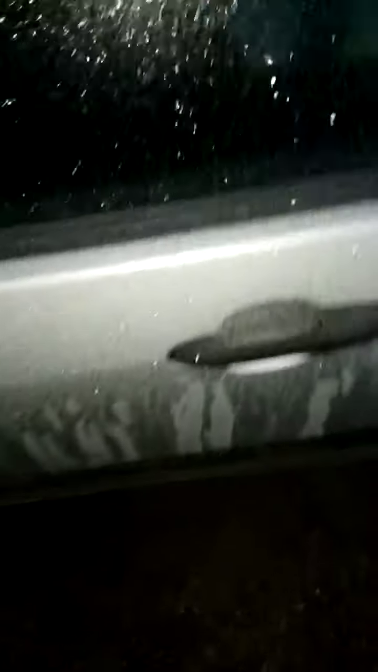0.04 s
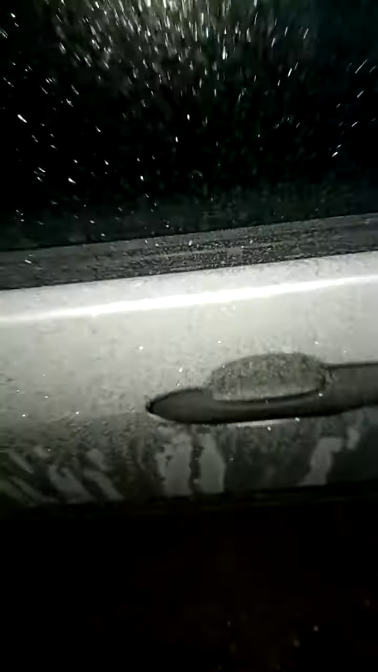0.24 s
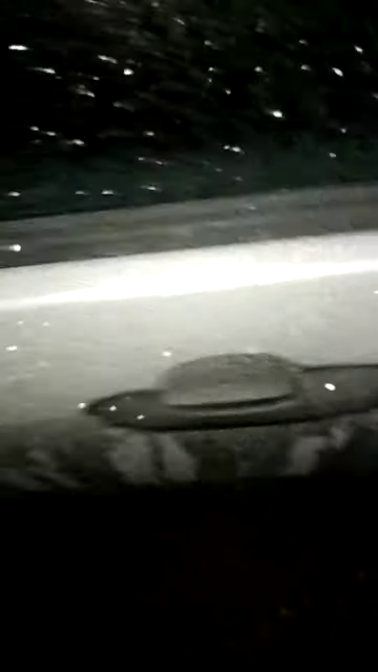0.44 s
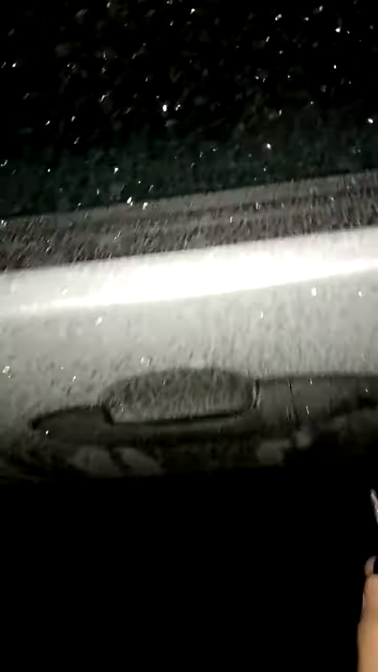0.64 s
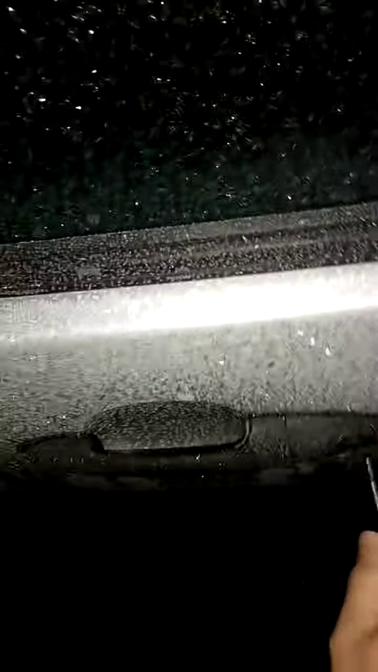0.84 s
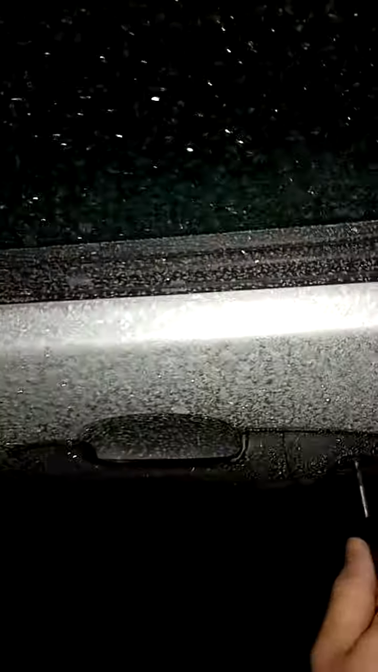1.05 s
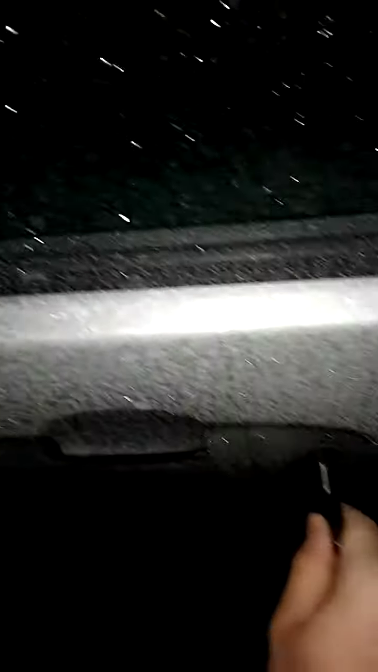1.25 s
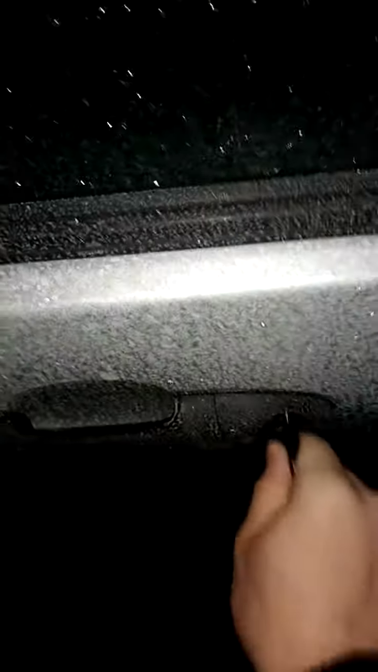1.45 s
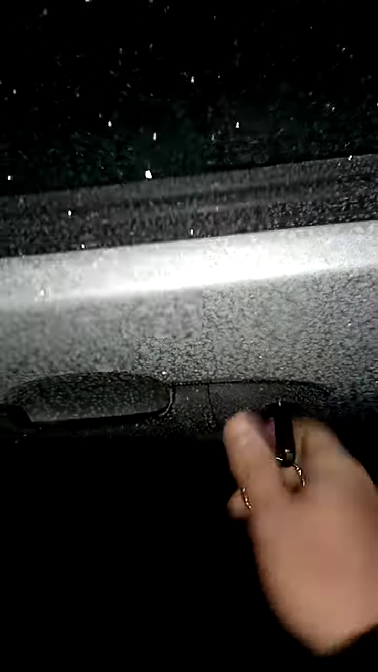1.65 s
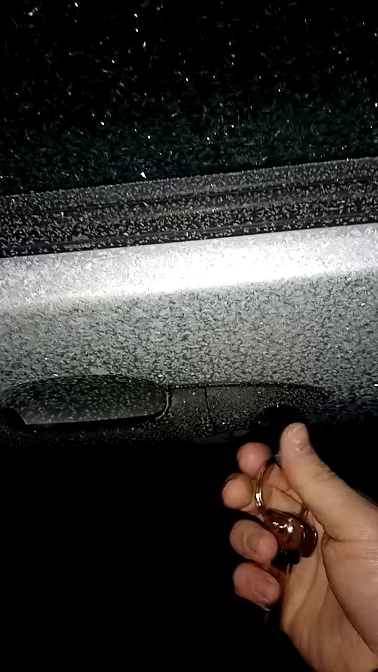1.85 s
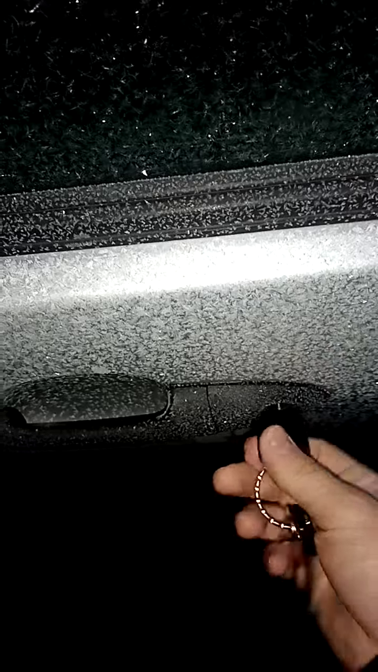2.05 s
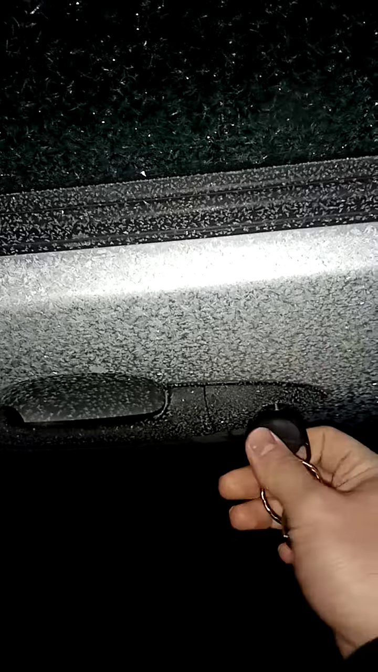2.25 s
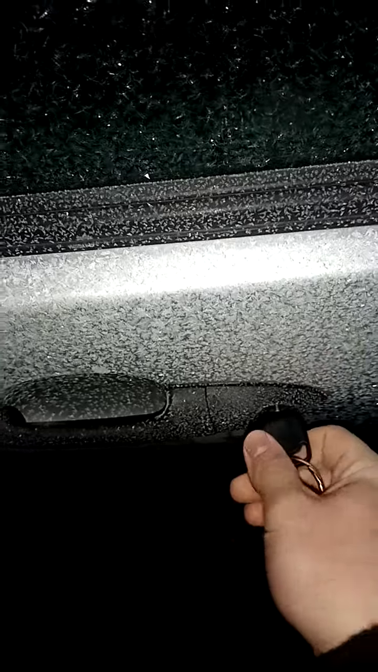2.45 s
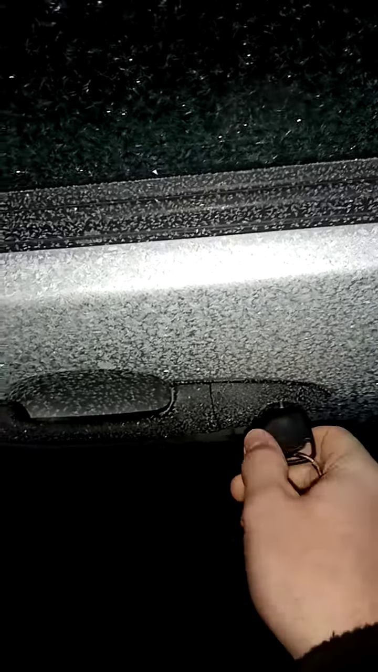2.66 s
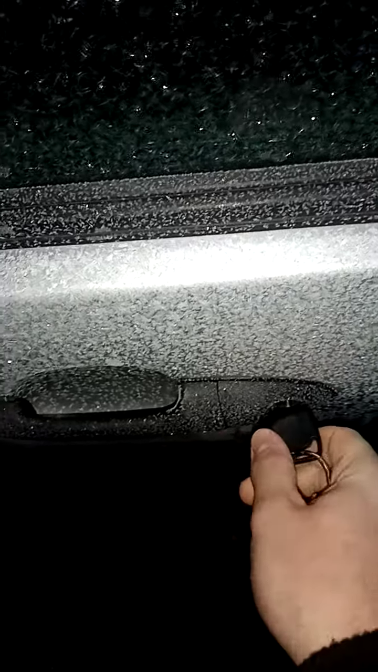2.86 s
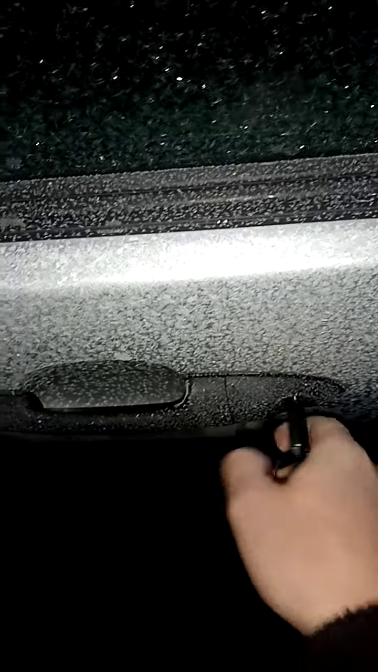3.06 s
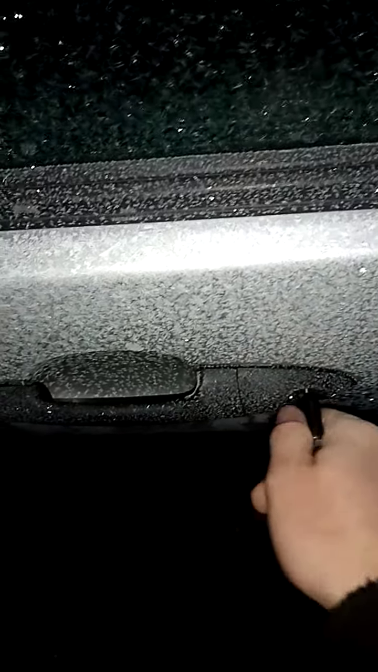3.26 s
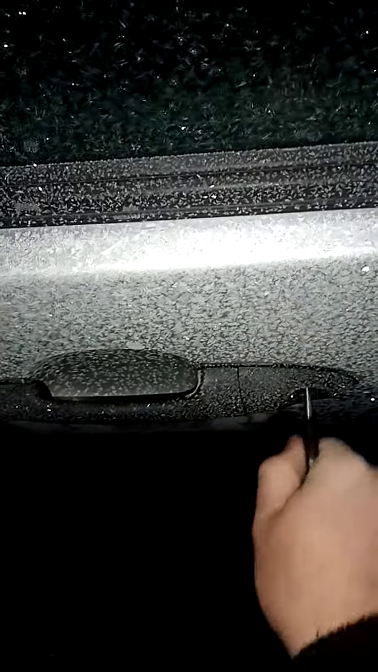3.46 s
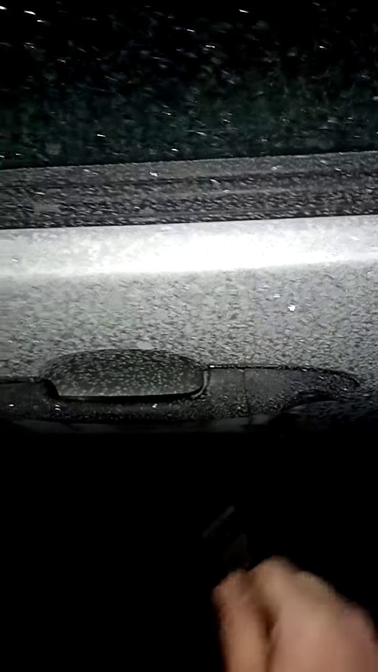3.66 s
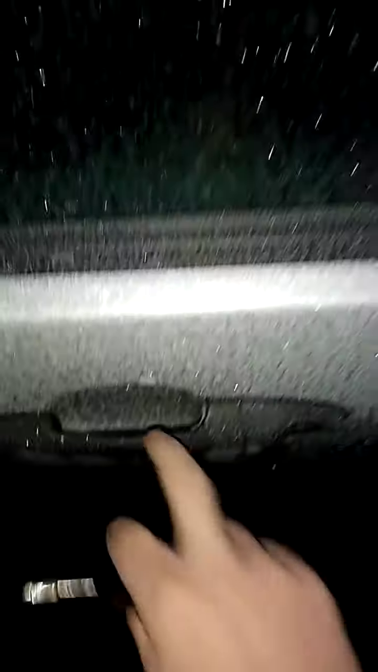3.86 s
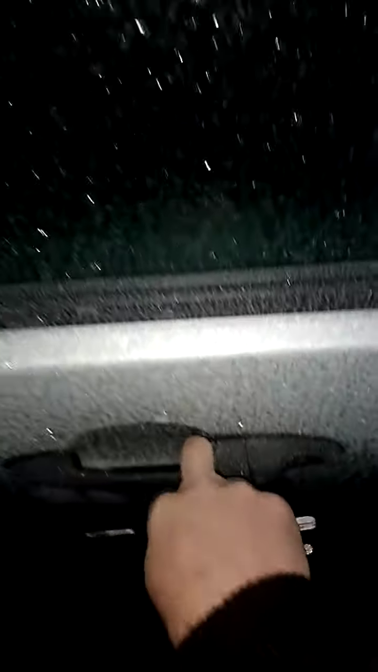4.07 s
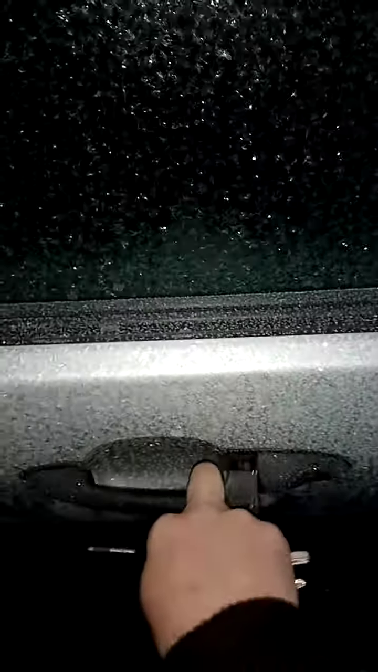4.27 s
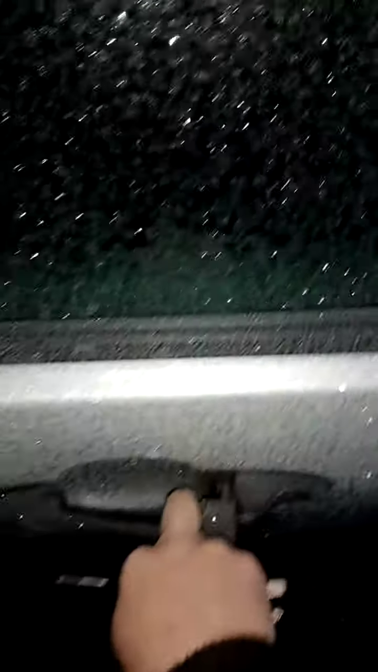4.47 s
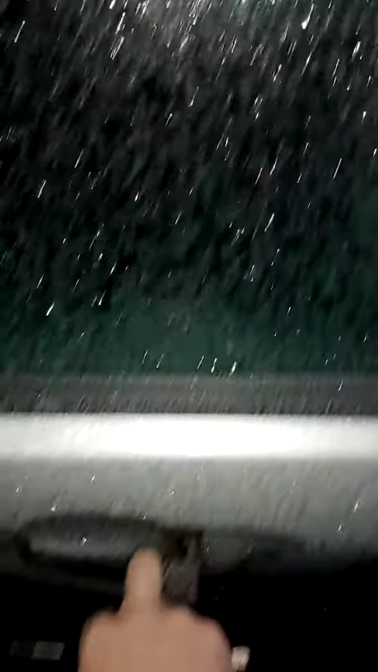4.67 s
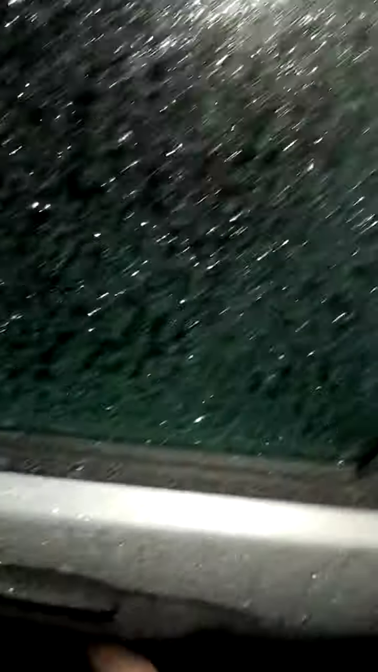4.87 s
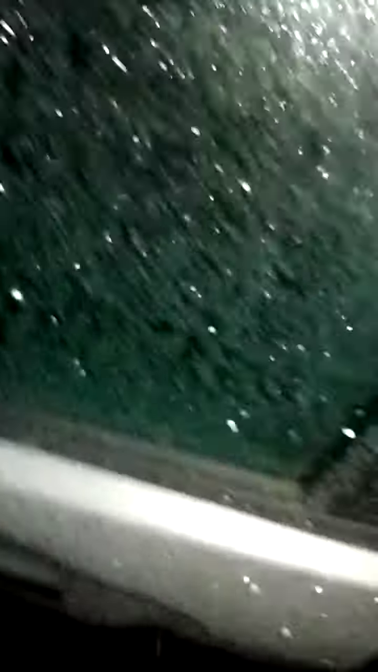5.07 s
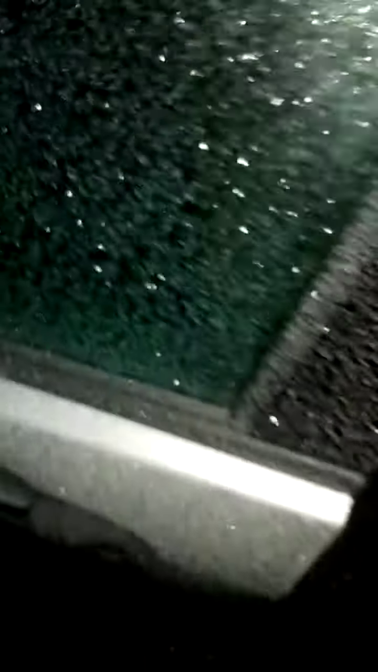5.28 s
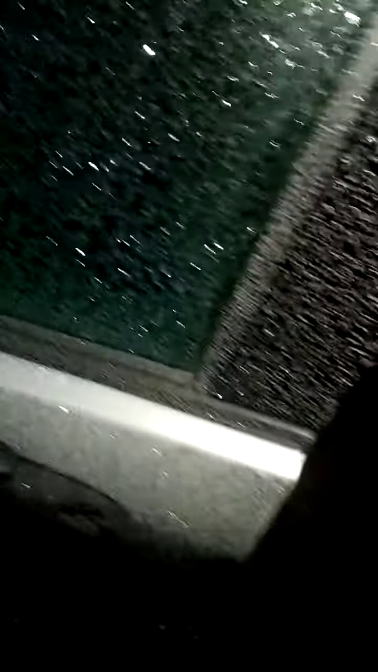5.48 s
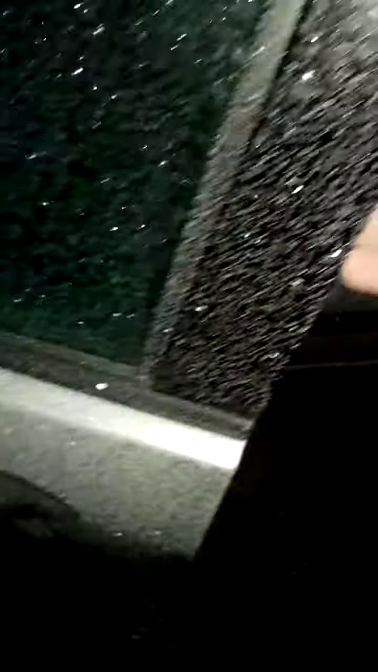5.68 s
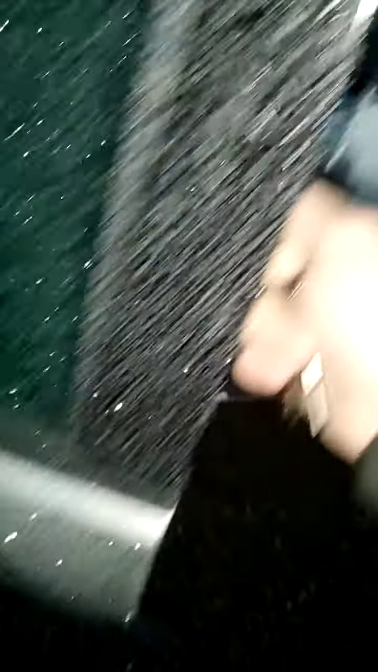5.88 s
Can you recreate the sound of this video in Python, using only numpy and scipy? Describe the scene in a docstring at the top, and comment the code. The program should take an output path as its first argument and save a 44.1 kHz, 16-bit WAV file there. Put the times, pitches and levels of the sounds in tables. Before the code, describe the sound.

A quiet night outdoors, faint low air and slight hiss, with a phone microphone very close to a car door; one side is crisp, the other muffled by the hand. In the first 0.4 s fingers scuff frost with small dull ticks and nylon rustle. Soft knocks follow at 0.6 and 0.9-1.1 s, then a hollow bump at 1.45 s as the key seats. Keys jingle in thin, quick chinks from 1.6 to 1.9 s. At 2.35-2.45 s they chink brighter, then a hard knock at 2.65 s lands as a small lock motor whirs from about 2.55 to 2.95 s, ending in more jingling to 3.05 s. A rubbing bump comes at 3.45 s with a sleeve swish and faint zip. The loudest event is a deep, boomy handle clunk at 4.26 s. At 4.8 s the latch knocks sharply under a strong nylon swish and a short rising zip; soft rustles and faint ticks trail to the end.

```python
"""Outdoors at night a hand unlocks a frosted car door, heard by a phone held close.
The key scrapes into the lock and the keys chink: noise ticks and grains set dying sine tones ringing.
The handle clunks and the latch lets go: low door tones boom under bursts of noise. The lock motor whirs
as sines that speed up, with gear noise. A nylon sleeve rustles as patchy noise and zips as gliding tones.
One port of the phone faces the door, the other is muffled by the hand."""
import sys
import numpy as np
from scipy import signal
from scipy.fft import rfft, irfft
from scipy.io import wavfile
from scipy.ndimage import uniform_filter1d

SR = 44100
rng = np.random.default_rng(int(sys.argv[2]) if len(sys.argv) > 2 else 0)


def to_wav(s):
    """Save 16-bit WAV."""
    ch = np.atleast_2d(s).T  # columns
    pcm = np.round(np.clip(ch, -1, 1) * 32767)  # PCM
    wavfile.write(sys.argv[1], SR, pcm.astype(np.int16))


N = 261072

# tone colour of a dull knock on the door, also of the motor's grit: (pitch_hz, relative level_db)
KNOCK_COLOUR = [(240, 1.5), (400, -8), (610, -6.5), (1270, -15), (1790, -12), (2510, -30.5), (3000, -25),
                (3900, -31.5), (6600, -120)]
# tone colour of a sharp crack on the door, also of key grit: (pitch_hz, relative level_db)
CRACK_COLOUR = [(1350, -23), (2300, 5), (3870, -0.5), (4450, 0.5), (5990, 4.5), (13500, -20.5),
                (15100, -3.5), (16000, -14), (16500, -57)]
# five keys a-e, each a list of ringing tones:
# (pitch_hz, relative level_db, fade_s for 60 dB before the damping factor)
KEY_TONES = [
    [(4527, -2, .1), (5480, 0, .1)],
    [(7520, 0, .3), (8620, -9, .06), (8740, -9, .06)],
    [(6745, -3, .05), (9150, 0, .09)],
    [(12070, -2, .08), (12190, -2, .08), (13120, -5, .11)],
    [(15460, 0, .1), (14860, -14, .06)],
]
# shape of a hand's press: level one rise or fall away from the peak; a higher power is a flatter top
PRESS_ENDS_DB, PRESS_ROUND = -17.5, 1.25


def gain_of(db):
    """Turns decibels into an amplitude factor."""
    return 10 ** (np.asarray(db) / 20)


def evened(x):
    """Scales a sound to an average (RMS) strength of 1."""
    return x / np.sqrt(np.mean(x ** 2) + 1e-20)


def read(points, hz):
    """Reads a curve of (pitch_hz, value) points, with straight lines over log pitch."""
    f, value = np.transpose(points)
    return np.interp(np.log(hz + 1), np.log(f + 1), value)


def add(mix, s, sound):
    """Adds a sound into the mix at s seconds, cut off at the end."""
    part = mix[round(s * SR):][:len(sound)]
    part += sound[:len(part)]


def coloured(x, points):
    """Filters x by a (pitch_hz, level_db) curve, silent outside it."""
    hz = np.fft.rfftfreq(len(x), 1 / SR)
    inside = (hz > points[0][0]) & (hz < points[-1][0])
    return irfft(rfft(x) * gain_of(read(points, hz)) * inside, len(x))


def ring(modes, size, spread_db, detune=0., rise_s=.0002, damping=0.8):
    """Sums dying sine tones of a struck object, a little different each time; peak 1."""
    hz, db, t60 = np.transpose(modes)[:, :, None]
    t = np.arange(size) / SR
    level_chance, phase_chance, pitch_chance = rng.standard_normal((3, len(modes), 1))
    turn = 2 * np.pi * hz * (1 + detune * pitch_chance) * t + 0.64 * phase_chance
    fading = gain_of(db + spread_db * level_chance - 60 * t * damping / t60)
    x = (fading * np.sin(turn)).sum(0) * (1 - np.exp(-t / rise_s))
    return x / abs(x).max()


def burst(noise, t60, size, rise_s):
    """A puff of noise: a random piece that rises fast and fades by 60 dB in t60 seconds."""
    t = np.arange(size) / SR
    start = rng.integers(len(noise) - size)
    return noise[start:start + size] * gain_of(-60 * t / t60) * (1 - np.exp(-t / rise_s))


def swells(rows, ends_db, round_top):
    """Loudness of summed swells (peak_s, rise_s, fall_s, level_db), curving down on both sides."""
    t = np.arange(N) / SR
    s, rise, fall, db = np.transpose(rows)[:, :, None]
    away = np.where(t < s, (s - t) / rise, (t - s) / fall)[:, ::32]
    power = gain_of(np.maximum(db + ends_db * away ** round_top, -140)) ** 2
    return np.interp(t, t[::32], np.sqrt(power.sum(0)))


def night():
    """The quiet night: steady, mostly low noise, drawn separately for each port."""
    # tone colour of the night: (pitch_hz, relative level_db)
    night_colour = [(45, 6.5), (150, 0.5), (900, -10.5), (2500, -23.5), (8000, -22), (12000, -62)]
    level_db = -70.5
    sides = [evened(coloured(rng.standard_normal(N), night_colour)) for _ in "lr"]
    return gain_of(level_db) * np.array(sides)


def rustle(spectrum, level, patchy_db, flicker_db):
    """Noise in drifting patches with a flicker shared by all pitches, following the arm."""
    frames = N // 128 + 5
    a, b, patches = rng.standard_normal((frames, 257, 3)).T
    patches = evened(uniform_filter1d(uniform_filter1d(patches, 5, 0), 16, 1))
    flicker = evened(uniform_filter1d(rng.standard_normal(frames), 3))
    z = (a + 1j * b) * gain_of(patchy_db * patches + flicker_db * flicker)
    noise = signal.istft(z, nperseg=512, noverlap=384)[1][:N]
    # each stroke is 18 dB down one rise or fall away from its peak
    return evened(coloured(noise, spectrum)) * swells(level, -18, 2.75)


def sleeve():
    """Each arm movement swells a bright nylon rustle and a duller brushing."""
    # movements of the arm: (peak_s, rise_s, fall_s, rustle level_db, brush level_db)
    strokes = [(.152, 0.06, 0.037, -60, -57), (.25, 0.7, 0.65, -67, -66), (.64, 0.27, 0.21, -55, -59),
               (1.02, 0.088, 0.023, -71, -67), (1.43, 0.12, 0.08, -58.5, -60), (1.74, 0.27, 0.15, -63, -64),
               (2.06, 0.16, 0.32, -78, -72), (2.42, 0.057, 0.013, -56.5, -65),
               (2.58, 0.054, 0.16, -67.5, -59), (2.95, 0.24, 0.22, -66, -68.5),
               (3.583, 0.17, 0.13, -52.5, -60.5), (3.9, 0.21, 0.34, -60, -63.5),
               (4.35, 0.08, 0.36, -70.5, -68), (4.823, 0.25, 0.13, -47, -53.5),
               (5.06, 0.13, 0.11, -63.5, -64.5), (5.242, 0.17, 0.1, -59.5, -64),
               (5.521, 0.16, 0.17, -65, -65.5), (5.93, 0.21, .2, -63, -66.5)]
    # tone colour of the nylon rustle: (pitch_hz, relative level_db)
    nylon_colour = [(1240, -42), (2100, -11.5), (3150, 0.5), (3910, -6.5), (6710, 0.5), (10500, -14),
                    (12600, -19), (13500, -18.5), (14800, -4), (15700, -4)]
    # tone colour of the duller brushing: (pitch_hz, relative level_db)
    brush_colour = [(250, -6.5), (400, -2), (900, -9), (1700, -7), (2100, -16.5), (2600, -12.5)]
    rustle_swells = [row[:4] for row in strokes]
    brush_swells = [row[:3] + row[4:] for row in strokes]
    return rustle(nylon_colour, rustle_swells, 2.36, 1.0) + rustle(brush_colour, brush_swells, 1.8, 1.37)


def door():
    """The door skin booms under rubbing and blows; each blow adds a thud, a knock and a crack."""
    # ringing tones of the door: (pitch_hz, relative level_db, fade_s for 60 dB before the damping factor)
    door_tones = [(162.7, -1.5, 0.22), (198.3, 2.5, 0.13), (234.35, -2, 0.32), (282.3, -4, 0.16),
                  (353, -10.5, 0.34), (424, -13.5, 0.15)]
    # key or hand pressing on the door skin: (peak_s, rise_s, fall_s, level_db)
    pushes = [(.08, 0.34, 0.29, -65.5), (.97, 0.069, 0.07, -60.5), (1.37, 0.037, 0.22, -44),
              (1.58, 0.042, 0.52, -52.5), (2.1, 0.37, 0.95, -67.5), (2.6, 0.16, 0.96, -54),
              (3.45, 0.061, 0.06, -39.5), (3.55, 0.091, 0.11, -60), (3.89, 0.015, 0.14, -54),
              (4.2, 0.053, 0.33, -43.5), (4.57, 0.04, 0.26, -62), (4.76, 0.024, 0.3, -48),
              (5.47, 0.26, 0.068, -65.5)]
    # blows on the door: (start_s, boom level_db, boom centre pitch_hz, knock level_db, crack level_db),
    # levels before the offsets in the loop below
    blows = [(0.031, -45, 310, -58.5, -50), (0.616, -53, 333, -50.5, -49.5), (0.9, -43.5, 210, -53, -62.5),
             (1.092, -40, 211, -51, -45.5), (1.454, -32, 210, -53.5, -39), (1.852, -42, 220, -61.5, -72),
             (1.993, -53, 218, -64.5, -56), (2.107, -76, 220, -63.5, -60), (2.283, -58, 220, -66.5, -57),
             (2.354, -41, 218, -50, -68), (2.404, -34, 185, -50, -43), (2.539, -47, 240, -51.5, -80),
             (2.65, -27, 180, -33.5, -37), (2.709, -39, 260, -51, -53), (2.821, -31, 258, -41.5, -44.5),
             (2.91, -38, 300, -45.5, -42.5), (3.133, -40, 250, -47, -56.5), (3.311, -46.5, 240, -79, -63.5),
             (3.439, -32, 230, -56.5, -64), (3.876, -50, 220, -78, -71), (4.142, -46, 200, -55, -72),
             (4.164, -31.5, 202, -54.5, -50.5), (4.184, -34, 277, -48.5, -45),
             (4.2556, -12.5, 193, -36, -36), (4.289, -18, 189, -74, -70), (4.347, -32, 230, -48, -51),
             (4.537, -44, 198, -57, -61), (4.785, -33, 240, -38.5, -42.5), (4.795, -26, 240, -50, -50),
             (5.473, -55, 221, -54, -47)]
    resting_db = -80.5
    focus_db = -28  # change for a door tone one octave from the centre of the boom

    jolts = rng.standard_normal(N) * (rng.random(N) < 180 / SR)  # stick-slip of key and hand
    skin = ring(door_tones, 6500, 0.12, rise_s=0.0019, damping=3.4)
    rubbing = evened(signal.oaconvolve(jolts, skin)[:N])
    out = rubbing * (swells(pushes, PRESS_ENDS_DB, PRESS_ROUND) + gain_of(resting_db))

    knock = evened(coloured(rng.standard_normal(SR), KNOCK_COLOUR))
    crack = evened(coloured(rng.standard_normal(SR), CRACK_COLOUR))
    # the crowd of higher panel tones
    thud = evened(coloured(rng.standard_normal(SR), [(300, 13.0), (1500, -19)]))
    for s, boom_db, boom_hz, knock_db, crack_db in blows:
        struck = [(hz, db + focus_db * np.log2(hz / boom_hz) ** 2, t60) for hz, db, t60 in door_tones]
        boom = ring(struck, 14000, 2.6, detune=0.02, rise_s=0.00098, damping=0.99)
        add(out, s, gain_of(boom_db) * boom)
        first_contact = burst(crack + knock, 0.0099, 600, 0.00027)
        add(out, s, gain_of(crack_db - 10.5) * first_contact)
        add(out, s, gain_of(boom_db - 14.5) * burst(thud, 0.22, 16000, 0.0054))
        # knock and crack each have a quick part and a weaker, slower tail
        knocking = burst(knock, 0.11, 8000, 0.00048) + gain_of(-5.0) * burst(knock, 0.16, 8000, 0.0039)
        add(out, s, gain_of(knock_db + 3.5) * knocking)
        cracking = burst(crack, 0.029, 8000, 0.0016) + gain_of(-7.5) * burst(crack, 0.068, 8000, 0.0064)
        add(out, s, gain_of(crack_db + 4.0) * cracking)
    return out


def ticks():
    """Small short ticks of frost, plastic, fingers, lock and keys, from dull to bright.

    Each is a cluster of four tones that fades within about 15 ms."""
    # ticks: (start_s, peak level_db, main pitch_hz before a small random detuning)
    tick_list = [(.064, -37, 400), (.098, -45.5, 600), (.146, -38.5, 1500), (.222, -52, 1720),
                 (0.242, -50, 1930), (.338, -48.5, 2650), (0.274, -46, 1040), (0.292, -48, 1420),
                 (.317, -36.5, 1640), (.641, -33, 717), (1.76, -45, 1520), (2.654, -32, 1770),
                 (2.822, -31.5, 1790), (4.786, -31, 3150), (0.903, -42.5, 1730), (4.946, -45.5, 1280),
                 (4.974, -51, 1000), (5.411, -48, 1470), (5.43, -47, 1495), (2.475, -50, 6100),
                 (1.503, -49, 790)]
    out = np.zeros(N)
    for s, db, hz in tick_list:
        modes = [(hz, -.1, .014), (1.142 * hz, -3, .011), (1.49 * hz, -7, .012), (0.815 * hz, -7, .012)]
        add(out, s, gain_of(db) * ring(modes, 2000, 1.6, detune=0.052, rise_s=0.00032))
    return out


def scuffle():
    """Fingers scuff the frost: a dense run of small dull ticks under one swell."""
    ticks_per_s, pitches = 500, 6
    swell = (0.16, 0.066, 0.038, -51)  # peak_s, rise_s, fall_s, level_db
    out = np.zeros(N)
    for hz in rng.uniform(960, 2620, size=pitches):
        hits = rng.standard_normal(N) * (rng.random(N) < ticks_per_s / pitches / SR)
        out += signal.oaconvolve(hits, ring([(hz, 0, .006)], 1000, 0, rise_s=.001))[:N]
    return out * swells([swell], PRESS_ENDS_DB, PRESS_ROUND)


def keys():
    """Each chink is a short bright tick that sets the keys ringing; they touch again and chatter."""
    # chinks: (start_s, tick level_db before offset, the two keys a-e that meet,
    # ring level_db of the first, ring level_db of the second), ring levels before the chatter
    chinks = [(1.609, -53, "ad", -61, -72), (1.664, -48, "cd", -66, -62), (1.68, -40, "ec", -43, -69),
              (1.7125, -52, "cd", -70, -69), (1.7419, -39, "ec", -55, -59),
              (1.813, -31, "cd", -42.5, -47.5), (1.826, -36, "ce", -48, -51), (1.8493, -30, "cd", -53, -56),
              (1.873, -35.5, "ec", -50, -57), (1.914, -41, "cd", -50.5, -58),
              (2.146, -61, "dc", -67, -67.5), (2.197, -46.5, "ec", -57, -65.5),
              (2.3364, -28.5, "ec", -63, -68), (2.352, -25, "bc", -45, -43), (2.3622, -33, "ce", -42, -41),
              (2.3794, -28, "cb", -48, -48), (2.392, -43, "ec", -54, -46), (2.405, -28, "ed", -46, -69),
              (2.428, -55, "ce", -48.5, -73), (2.4743, -51, "ce", -62, -63), (2.762, -44, "ed", -61, -65),
              (2.853, -63, "ac", -55, -60), (2.874, -45.5, "ed", -59, -62.5), (2.9407, -31, "eb", -39, -72),
              (2.9644, -27.5, "ea", -41, -49), (2.995, -31, "ab", -47, -59), (3.033, -52, "ec", -50, -72)]
    # bare bright clicks of key tip and ring that leave no ringing: (start_s, level_db before offset)
    clicks = [(.215, -39), (1.003, -52), (1.0452, -54), (1.1253, -37.5), (1.889, -43), (2.06, -50),
              (2.31, -52), (2.364, -27), (2.897, -45), (3.457, -37), (3.464, -35)]
    # the other keys ring below the second key of the pair, by a varying amount
    other_keys_db, other_spread_db = -17, 4
    bright_colour = [(3000, -6), (9000, 14.5), (11000, -6), (12200, 1.0), (15000, 8.5), (16600, -36)]
    bright = evened(coloured(rng.standard_normal(SR), bright_colour))
    out = np.zeros(N)
    for s, tick_db, pair, first_db, second_db in chinks:
        tick = burst(bright, 0.0045, 4000, 0.00039) + gain_of(-13.5) * burst(bright, 0.05, 4000, 0.0022)
        add(out, s, gain_of(tick_db - 3.0) * tick)
        for name, modes in zip("abcde", KEY_TONES):
            other_db = second_db + other_keys_db + other_spread_db * rng.standard_normal()
            db = {pair[0]: first_db, pair[1]: second_db}.get(name, other_db)
            wobble = uniform_filter1d(uniform_filter1d(rng.standard_normal(12000), 160), 90)
            chatter = gain_of(4.1 * np.minimum(evened(wobble), 1))
            ringing = ring(modes, 12000, 3.5, detune=.002, rise_s=.002, damping=1.3)
            add(out, s, gain_of(db) * chatter * ringing)
    for s, db in clicks:
        add(out, s, gain_of(db - 1) * burst(bright, 0.003, 600, 0.000092))
    return out


def heaves():
    """The whole car body heaves under the heavier pushes: short, deep, slow-starting rings."""
    # heaves: (start_s, peak level_db)
    heave_list = [(1.365, -47), (1.461, -41), (1.52, -45), (1.875, -49), (3.462, -40.5), (3.498, -47.5),
                  (4.26, -27.5), (4.299, -32), (5.392, -53.5)]
    # ringing tones of the body: (pitch_hz, relative level_db, fade_s for 60 dB before the damping factor)
    body_tones = [(75, -12, 0.14), (103, -9, 0.22), (113.5, -8.5, 0.26)]
    out = np.zeros(N)
    for s, db in heave_list:
        add(out, s, gain_of(db) * ring(body_tones, 15000, 1.4, detune=0.066, rise_s=0.01))
    return out


def scrape():
    """Tiny contacts between swinging keys: uneven gritty grains that keep the bunch murmuring."""
    # spans while the bunch swings: (start_s, end_s)
    shaking = [(1.56, 1.95), (2.35, 2.44), (2.85, 3.06)]
    t = np.arange(N) / SR
    swinging = sum((t > a) & (t < b) for a, b in shaking)
    contacts = rng.random(N) < 200 / SR  # about 200 a second
    size = gain_of(3.5 * np.minimum(rng.exponential(1, N), 4)) * contacts * swinging
    grain_fade = gain_of(-60 * t[:600] / 0.0078)
    gritty_noise = evened(coloured(rng.standard_normal(N), CRACK_COLOUR))
    grit = signal.oaconvolve(size, grain_fade)[:N] * gritty_noise
    last_three_keys = sum(KEY_TONES[2:], [])
    murmur = signal.oaconvolve(grit, ring(last_three_keys, 4000, 1, damping=3.5))[:N]
    return gain_of(-73) * grit + gain_of(-75) * evened(murmur)


def snap():
    """One dry pop: a sudden downward jump of pressure that dies away within a few milliseconds."""
    start_s, peak_db = 1.8895, -37
    return start_s, -gain_of(peak_db) * np.exp(-np.arange(200) / 12)


def motor():
    """The lock motor spins up: sines at multiples of its turning rate, with a gritty gear buzz."""
    # tones of the motor: (multiple of the turning rate, relative level_db)
    gears = [(1, 2.5), (2, -8), (4, -7), (11, -17.5), (21.5, -21)]
    start_s, run_s = 2.559, 0.393
    full_hz, full_db = 162, -51.5  # turning rate and level once up to speed, before the wobbles
    spin_up_s, start_slower, start_db = 0.0243, 0.1322, -1  # it starts slower by this share, and softer
    t = np.arange(0, run_s, 1 / SR)
    lag = np.exp(-t / spin_up_s)
    hz = full_hz * (1 - start_slower * lag)
    db = full_db + start_db * lag
    wobble = 1 + 0.394 * uniform_filter1d(rng.standard_normal(len(t)), 200)
    turn = 2 * np.pi * np.cumsum(hz * wobble) / SR
    hum = np.sqrt(2) * sum(gain_of(d) * np.sin(k * turn) for k, d in gears)
    grit = evened(coloured(rng.standard_normal(len(t)), KNOCK_COLOUR))
    buzz = gain_of(-9.5) * grit * (1 + np.cos(turn))  # the grit pulses once a turn
    labour = evened(uniform_filter1d(rng.standard_normal(len(t)), 1200))  # the load keeps changing
    return start_s, gain_of(db + 3.8 * labour) * (hum + buzz) * signal.windows.tukey(len(t), .06)


def zip_tone(second_db, rows):
    """A breathy gliding tone with its octave: narrow noise carried on the thread rate."""
    s, hz, db = np.transpose(rows)
    t = np.arange(s[0], s[-1], 1 / SR)
    hz = uniform_filter1d(np.interp(t, s, hz), 600)
    db = np.interp(t, s, db)
    fuzz = uniform_filter1d(uniform_filter1d(rng.standard_normal((4, len(t))), 110), 110)
    fuzz = .85 + .5 * (evened(fuzz[:2]) + 1j * evened(fuzz[2:]))
    turn = np.exp(2j * np.pi * np.cumsum(hz) / SR)
    tone = (fuzz[0] * turn + gain_of(second_db) * fuzz[1] * turn ** 2).real  # squaring gives the octave
    return s[0], gain_of(db) * tone * signal.windows.tukey(len(t), .2)


def zips():
    """Weave dragged over weave sings at the rate its threads pass: one glide per drag."""
    # drags: (relative octave level_db, glide points of (time_s, pitch_hz, level_db))
    drags = [(-21, [(3.53, 1043, -56), (3.565, 1700, -55.5), (3.6, 2060, -57.5), (3.63, 1700, -57.5),
             (3.675, 980, -59)]), (-6.5, [(4.745, 1260, -46), (4.78, 1750, -66), (4.838, 2650, -51),
             (4.858, 2880, -51.5), (4.88, 3120, -39.5), (4.9, 2960, -60)])]
    out = np.zeros(N)
    for second_db, rows in drags:
        add(out, *zip_tone(second_db, rows))
    return out


def scene():
    """Mixes the car, the sleeve and the night for the left and right ports."""
    cloth = sleeve() + zips()
    car = door() + ticks() + scuffle() + keys() + heaves() + scrape()
    add(car, *snap())
    add(car, *motor())
    return car + cloth * gain_of([[-4], [0]]) + night()  # the sleeve moves on the open port's side


def record(dry):
    """The open port is brighter and later; the paths round the hand to the other keep shifting."""
    # hand over the left port: (pitch_hz, level change_db)
    muffle = [(125, -1.5), (600, -4.5), (1800, -11.5), (6000, -22), (16000, -97)]
    lag_s, edge_hz = 0.00088, 16650  # delay of the open port; top of the pitch range

    # slowly drifting phase, stronger at higher pitches
    hz, _, z = signal.stft(dry[0], SR, nperseg=1024)
    shift = evened(uniform_filter1d(uniform_filter1d(rng.standard_normal(z.shape), 12, 0), 4, 1))
    shift_size = read([(100, 0.22), (600, 1.01), (3000, 4.3)], hz)[:, None]
    crept = signal.istft(z * np.exp(1j * shift * shift_size), nperseg=1024)[1][:N]

    hz = np.fft.rfftfreq(N, 1 / SR)
    treble_lift_db = 5.75 / (1 + (350 / (hz + 1)) ** 2)
    bass_cut_db = 10 * np.log10(1 + (70 / (hz + 1)) ** 4)
    open_db = 1.29 + treble_lift_db - bass_cut_db
    left = rfft(crept) * gain_of(open_db + read(muffle, hz))
    right = rfft(dry[1]) * gain_of(open_db) * np.exp(-2j * np.pi * hz * lag_s)
    hiss = gain_of(-86.0) * rng.standard_normal((2, N))  # microphone hiss
    ports = irfft([left, right], N) + hiss
    low_pass = signal.firwin(511, edge_hz, window=("kaiser", 9), fs=SR)
    return signal.oaconvolve(ports, low_pass[None], "same")


dry = scene()
out = record(dry)
to_wav(out)
```